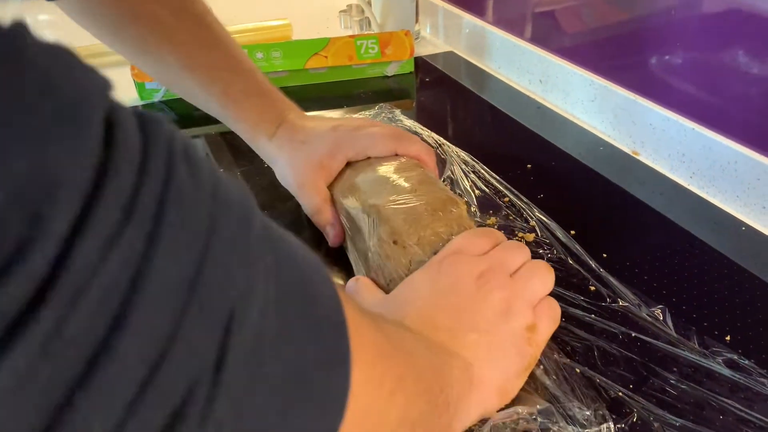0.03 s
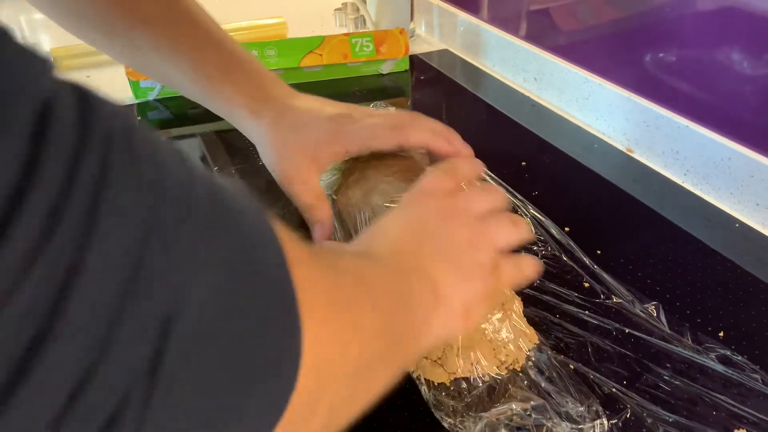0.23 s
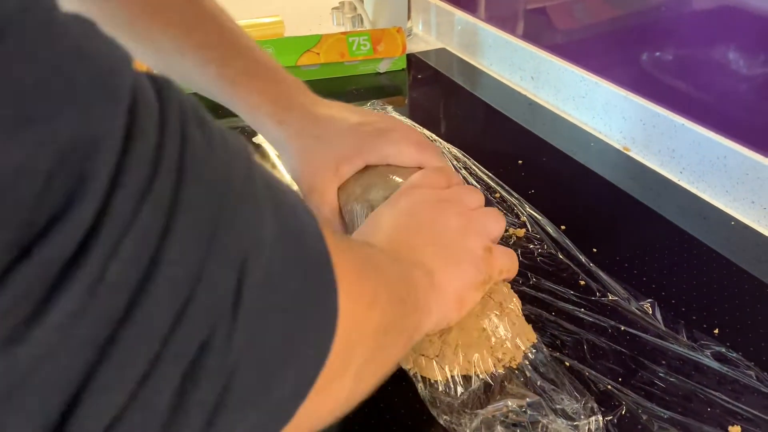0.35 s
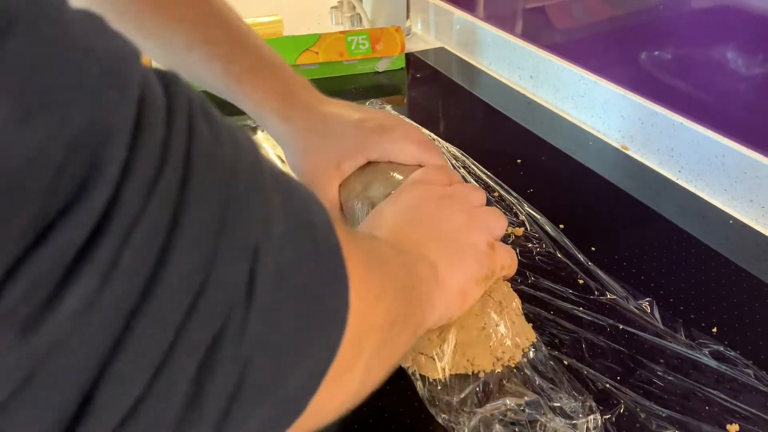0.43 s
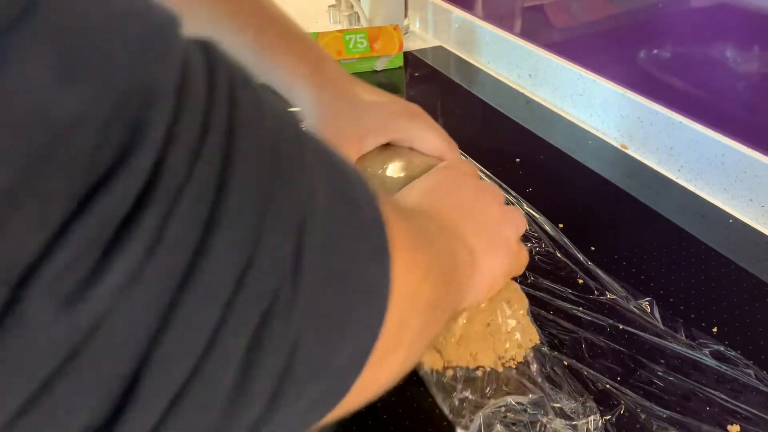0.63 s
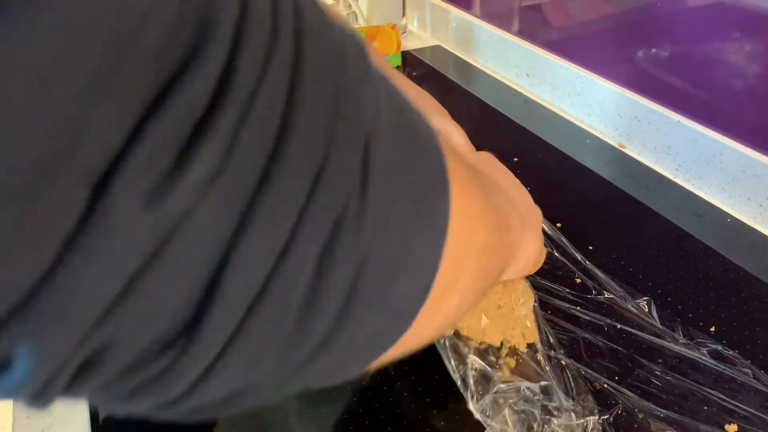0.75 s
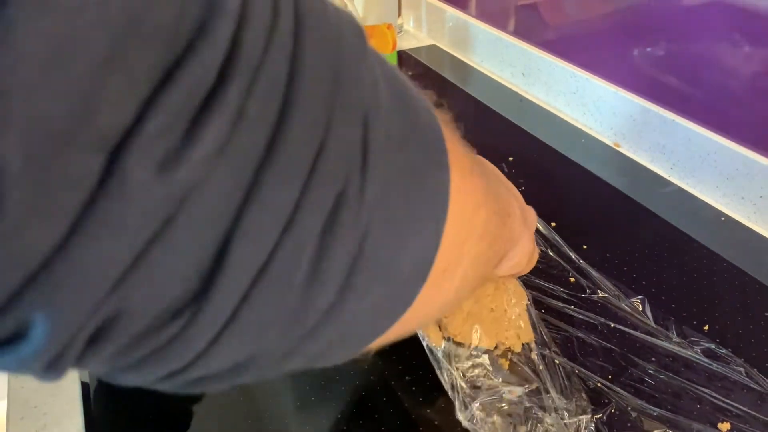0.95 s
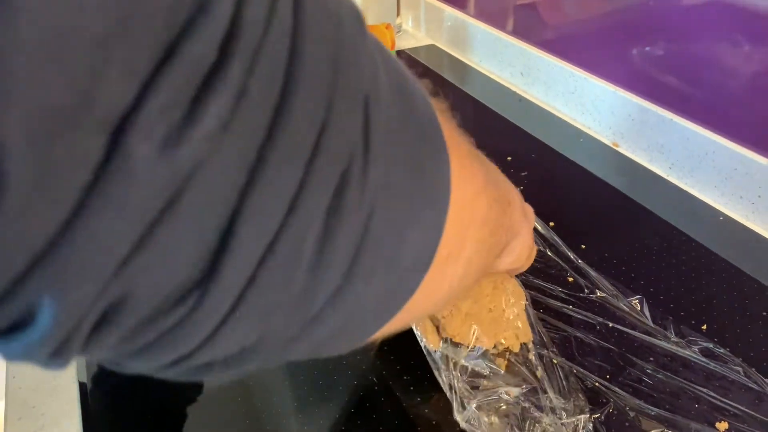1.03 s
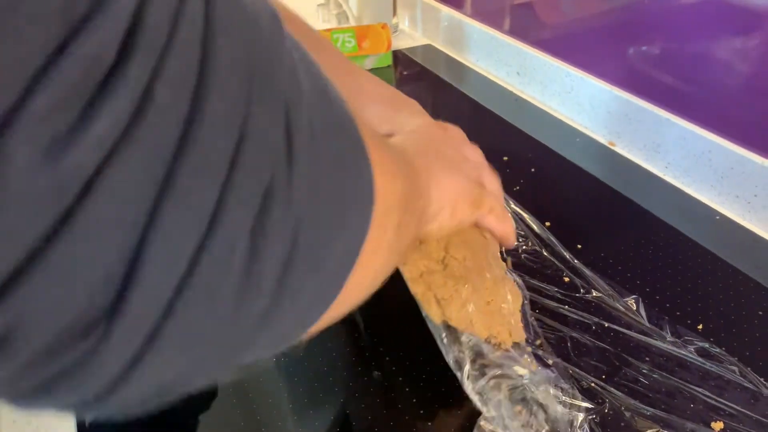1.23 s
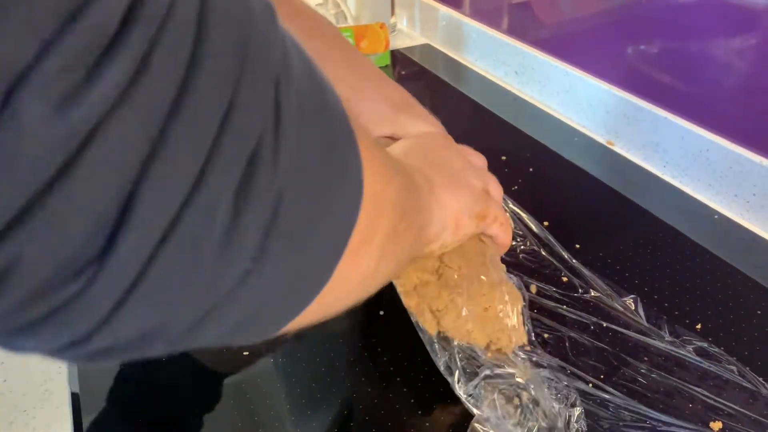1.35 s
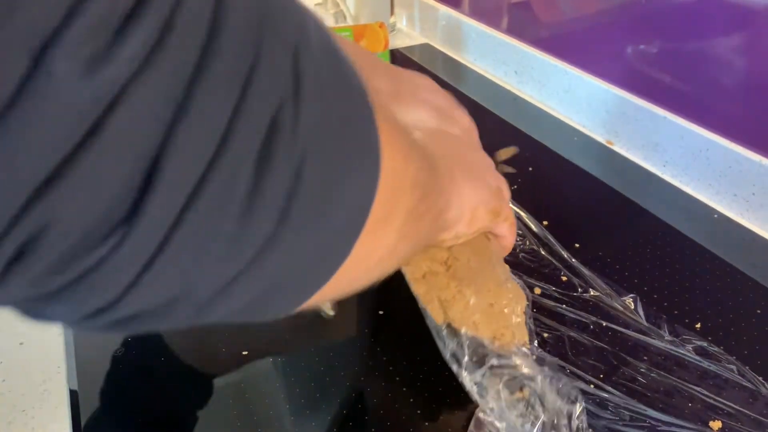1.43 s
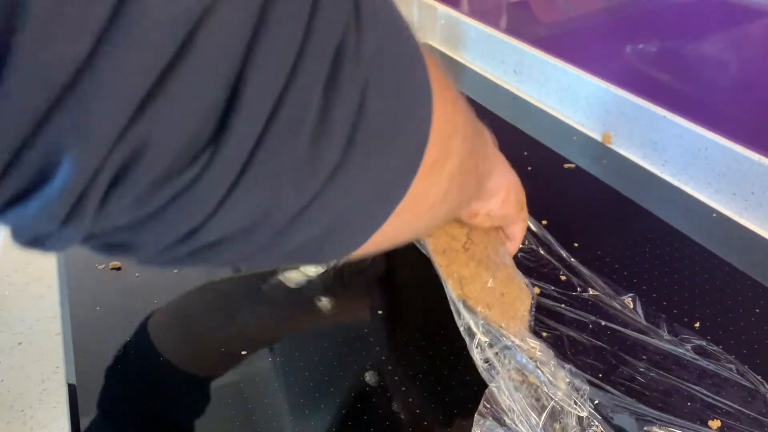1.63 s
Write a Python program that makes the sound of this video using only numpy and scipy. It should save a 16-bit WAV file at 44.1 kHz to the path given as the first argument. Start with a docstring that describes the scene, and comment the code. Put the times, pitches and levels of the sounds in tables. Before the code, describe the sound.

Cling film crackles around dough squeezed by hands on a kitchen worktop, close and in stereo. After a faint rustle, a deep dull thump lands at 0.2 s with a burst of crinkling. Dry crackle, palm rubbing and faint hollow tones continue to 0.75 s, then dip. A knocking thump hits near 0.9 s; from 1.1 s come bright snaps, rustling and softer thumps, strongest near 1.45 s.

```python
"""Hands wrap and squeeze dough in cling film on a kitchen worktop, close to a stereo microphone.
Faint rustle; at 0.2 s a press thumps (swinging sines) and knocks (decaying modes), the film snapping (damped sines).
Crackle (dense grains over noise), palm rub (coarser grains) and hollow tones (resonant noise) follow to 0.75 s.
At 0.88 s a second press knocks and thumps; from 1.1 s come more crackle, snaps and lesser thumps to the end.
The worktop grumbles and creaks (coloured noise) throughout, swelling with the presses."""
import sys
import numpy as np
from scipy import signal
from scipy.fft import rfft, irfft, next_fast_len
from scipy.io import wavfile
from scipy.ndimage import uniform_filter1d, map_coordinates

SR = 44100
rng = np.random.default_rng(int(sys.argv[2]) if len(sys.argv) > 2 else 0)


def output_pcm(signal):
    """Save a mono or channel-first signal as 16-bit PCM at the path in sys.argv[1].

    Samples are clipped to [-1, 1] before scaling.
    """
    pcm = np.clip(np.atleast_2d(signal).T, -1, 1) * 32767
    wavfile.write(sys.argv[1], SR, np.round(pcm).astype(np.int16))


N = 74970  # samples

# film crackle, before lift and flutter: (time [s], level [dB])
FILM_LEVEL = [(0.0, -62.5), (0.036, -50.5), (0.164, -69), (0.174, -66), (0.194, -42.5), (0.208, -51),
              (0.226, -57), (0.306, -59.5), (0.35, -48), (0.382, -54), (0.538, -44), (0.582, -51.5),
              (0.614, -46), (0.644, -49.5), (0.732, -53), (0.752, -48.5), (0.85, -66.5), (0.869, -66),
              (0.875, -47.5), (0.888, -48), (0.936, -57.5), (0.966, -58.5), (1.102, -46), (1.14, -51.5),
              (1.226, -45.5), (1.272, -56), (1.316, -49.5), (1.34, -54), (1.354, -50), (1.396, -50.5),
              (1.472, -55), (1.496, -51.5), (1.538, -56.5), (1.586, -48), (1.7, -49.5)]
# film crackle spectrum: (frequency [Hz], relative level [dB])
FILM_SPECTRUM = [(1760, -19), (3000, -5), (4190, -8.5), (5810, -4.5), (6270, -4.5), (10900, -1.5),
                 (15000, -3.5), (15800, -5.5)]
# loud single film snaps: (time [s], initial amplitude [dB], pitch [Hz])
SNAPS = [(0.193, -39, 13000), (0.2725, -43, 12600), (0.3307, -41, 11400), (0.3513, -32, 13600),
         (0.4703, -43, 8870), (0.6154, -33, 12300), (0.7163, -42, 10200), (0.874, -40, 9000),
         (0.8753, -39, 6400), (1.1575, -40, 7050), (1.188, -42, 7670), (1.2274, -32, 9700),
         (1.3056, -36, 13200), (1.3514, -36, 10400), (1.3555, -29, 13000), (1.3671, -35, 11400),
         (1.3745, -38, 11000), (1.476, -48, 10300), (1.5737, -36, 12000)]
# palms rubbing over film, before lift and flutter: (time [s], level [dB])
PALM_LEVEL = [(0.0, -68), (0.042, -58.5), (0.174, -71.5), (0.194, -46.5), (0.212, -57.5), (0.268, -65),
              (0.416, -60), (0.43, -50.5), (0.482, -55.5), (0.51, -47), (0.59, -53.5), (0.606, -49.5),
              (0.724, -59.5), (0.738, -55), (0.87, -67.5), (0.877, -51), (0.95, -63), (1.234, -55.5),
              (1.258, -60), (1.43, -55), (1.462, -57.5), (1.604, -59), (1.7, -63)]
# palm rub spectrum: (frequency [Hz], relative level [dB])
PALM_SPECTRUM = [(260, -15.5), (450, -8.5), (627, -6.5), (783, -2), (930, -0.5), (1140, -2), (2120, -8.5),
                 (5000, -11), (6500, -24.5), (11000, -120)]
# air pockets under cupped hands: (mid time [s], swell sigma [s], pitch [Hz], level [dB])
HOLLOWS = [(0.441, 0.028, 1130, -55.5), (0.446, 0.032, 2100, -56), (0.512, 0.013, 2083, -52),
           (0.517, 0.034, 1485, -53), (.56, 0.021, 2850, -57), (0.632, 0.025, 773, -54.5),
           (0.741, 0.0034, 354, -45), (1.088, 0.04, 875, -63.5), (1.198, 0.038, 820, -56),
           (1.202, 0.013, 333, -53.5), (1.421, 0.023, 895, -54)]
# presses thumping the worktop: (time of deepest swing [s], peak [dB], pitch [Hz], rise sigma [s])
THUMPS = [(0.221, -23.5, 64, 0.0074), (0.264, -34, 72, 0.0055), (0.321, -47.5, 66, 0.0075),
          (0.376, -51.5, 66, 0.015), (0.534, -49, 74, 0.017), (0.756, -45.5, 76.5, 0.015),
          (.907, -29, 63, 0.0071), (0.963, -45, 62, 0.007), (1, -46.5, 62, 0.012), (1.06, -46, 66, 0.0073),
          (1.19, -33, 65.4, 0.0093), (1.315, -42.5, 74, 0.011), (1.432, -39.5, 95, 0.0043),
          (1.456, -29.5, 67.3, 0.012), (1.503, -41, 68, 0.027), (1.624, -44, 63.6, 0.0084)]
# knuckle and fingertip knocks: (time [s], level at 270 Hz [dB], tilt [dB/octave])
KNOCKS = [(0.615, -42.5, 14.5), (.734, -49, 3.5), (.875, -33.5, 3), (.882, -37, -3.5), (0.891, -35.5, -1),
          (.919, -48.5, -14), (0.206, -43.5, -15.5)]
# worktop modes struck by knocks: (frequency [Hz], relative level [dB], t60 [s])
WORKTOP_MODES = [(186.3, -2.5, 0.075), (349, -5, 0.047), (435, -12, 0.016), (840, -28, 0.073)]
# low grumble under the kneading, before lift and flutter: (time [s], level [dB])
GRUMBLE_LEVEL = [(0.0, -75), (0.07, -59), (0.13, -77), (0.18, -68), (0.21, -37), (0.278, -51),
                 (0.382, -58.5), (0.506, -67.5), (0.65, -69), (0.75, -65), (0.86, -73), (0.9, -53),
                 (0.97, -48), (1.098, -60.5), (1.234, -56.5), (1.396, -59), (1.614, -58), (1.7, -65.5)]
# grumble spectrum: (frequency [Hz], relative level [dB])
GRUMBLE_SPECTRUM = [(12, -36), (20, -2.5), (41, -4.5), (62, 0.5), (126, -11), (150, -32.5), (200, -38),
                    (330, -120)]
# upper worktop resonances under the kneading, before flutter: (time [s], level [dB])
CREAK_LEVEL = [(0.0, -68.5), (0.08, -59), (0.156, -73), (0.202, -53.5), (0.268, -53.5), (0.306, -64),
               (0.634, -57), (0.704, -66), (0.738, -55), (0.868, -67), (0.884, -48.5), (0.994, -66),
               (1.24, -54), (1.264, -61.5), (1.414, -60.5), (1.448, -51), (1.548, -66), (1.7, -67)]
# creak spectrum: (frequency [Hz], relative level [dB])
CREAK_SPECTRUM = [(82, -24.5), (140, -1), (151, -14), (189, -1.5), (231, -10.5), (269, -7.5), (355, -4.5),
                  (470, -13), (600, -13.5), (780, -24), (1320, -120)]
# power that arrives straight: (frequency [Hz], share [0-1])
DIRECT_SHARE = [(60, .98), (300, .93), (600, .75), (1000, .65), (2800, .45), (5600, .5), (9000, .35)]
# stereo side gain: (frequency [Hz], gain [dB])
SIDE_GAIN = [(300, -2), (850, -7), (1200, 0), (7000, 0), (9500, -2), (11000, -17), (12500, -32)]
# channel balance: (frequency [Hz], left minus right [dB])
BALANCE = [(60, -1), (180, 3), (550, -1.5), (1650, -0.5), (4970, 3), (15000, -1)]

GRAINS_PER_S, GRAIN_SPREAD_LOG, GRAIN_DECAY_CYCLES = 5000, 0.47, 1.13
FILM_GRAIN_HZ, FILM_SIZE_DB, FILM_NOISE_SHARE = 8870, 2.5, 0.3
PALM_GRAIN_HZ, PALM_SIZE_DB, PALM_NOISE_SHARE = 2370, 2.42, 0.55
SNAP_DECAY_CYCLES, FIZZ_DB, FIZZ_T60_S = 2.14, -9.5, 0.023
PATCH_RMS_DB, HOLLOW_Q = 2.5, 9.7
THUMP_TAIL_STRETCH = 0.79  # fall sigma / rise sigma
KNOCK_RISE_S = 0.0015
LEFT_LAG_S, TOP_HZ = 20 / 44100, 15830


def amp(db):
    """Amplitude from dB."""
    return 10 ** (np.asarray(db) / 20)


def unit(x):
    """x at rms 1."""
    return x / np.sqrt(np.mean(x ** 2) + 1e-20)


def along(points, hz):
    """Interpolate (frequency, value) rows on a log axis."""
    f, v = np.transpose(points)
    return np.interp(np.log(hz + 1), np.log(f + 1), v)


def level(rows):
    """Gain per sample from (time, dB) rows."""
    s, db = np.transpose(rows)
    return amp(np.interp(np.arange(N) / SR, s, db))


def wobble(knots_per_s):
    """Smooth random curve through Gaussian knots."""
    knots = rng.standard_normal(int(N * knots_per_s / SR) + 4)
    return map_coordinates(knots, [np.arange(N) * knots_per_s / SR])


def filtered(x, response):
    """x times a response of frequency."""
    m = next_fast_len(N + SR // 2)
    return irfft(rfft(x, m) * response(np.fft.rfftfreq(m, 1 / SR)), m)[..., :N]


def coloured(x, spectrum):
    """x shaped by a spectrum, at rms 1."""
    return unit(filtered(x, lambda hz: amp(along(spectrum, hz))))


def grains(s, size, hz, decay_cycles, length=64):
    """Sum of short damped sines, length in samples."""
    t = np.arange(length) / SR
    decay = np.exp(-t * hz[:, None] / decay_cycles)
    wave = size[:, None] * np.sin(2 * np.pi * hz[:, None] * t) * decay
    at = (s * SR).astype(int)[:, None] + np.arange(length)
    return np.bincount(at.ravel(), wave.ravel(), N + SR)[:N]


def whitened(x):
    """x with its average spectrum flattened, at rms 1."""
    hz, power = signal.welch(x, SR, nperseg=128)
    floor = 0.00087 * power.max()
    return unit(filtered(x, lambda f: np.interp(f, hz, power + floor) ** -.5))


def placed(straight, scattered):
    """Straight sound reaches the right channel first; scattered sound differs between channels."""
    def share(hz):
        return np.clip(along(DIRECT_SHARE, hz), 0, 1)

    def lag(hz):
        return np.exp(-1j * np.pi * hz * LEFT_LAG_S * np.array([[1], [-1]]))

    direct = filtered(straight, lambda hz: np.sqrt(share(hz)) * lag(hz))
    return direct + filtered(scattered, lambda hz: np.sqrt(1 - share(hz)))


def patchy(x):
    """Random gain patches in time and frequency, alike in both channels."""
    z = signal.stft(x, nperseg=512)[2]
    field = uniform_filter1d(rng.standard_normal(z.shape[1:]), size=4, axis=0)
    field = uniform_filter1d(field, size=6, axis=1)
    return signal.istft(z * amp(PATCH_RMS_DB * unit(field)), nperseg=512)[1][:, :N]


def crackle(per_s, hz, size_db, noise_share, spectrum):
    """Random grains of uneven size over noise, in three strands: straight, left, right."""
    count = int(per_s * N / SR)
    strands = []
    for _ in range(3):
        u, g = rng.random((count, 2)), rng.standard_normal(count)
        size = amp(-size_db * np.log(1 - u[:, 1])) * np.sign(g)  # exponential in dB, either sign
        pitch = np.clip(hz * np.exp(GRAIN_SPREAD_LOG * rng.permutation(g)), 300, SR / 2.5)
        snaps = whitened(grains(u[:, 0] * N / SR, size, pitch, GRAIN_DECAY_CYCLES))
        mix = np.sqrt(1 - noise_share) * snaps + np.sqrt(noise_share) * rng.standard_normal(N)
        strands.append(coloured(mix, spectrum))
    return unit(patchy(placed(strands[0], np.array(strands[1:]))))


def film_crackle():
    """Dense tiny film snaps over a rustle, fluttering in level."""
    flutter_db = 2.5 + 0.42 * wobble(60.14) + 0.87 * wobble(150.5)
    bed = crackle(GRAINS_PER_S, FILM_GRAIN_HZ, FILM_SIZE_DB, FILM_NOISE_SHARE, FILM_SPECTRUM)
    return bed * level(FILM_LEVEL) * amp(flutter_db)


def film_snaps():
    """Loud single snaps as damped sines, each with a short decaying fizz."""
    s, db, hz = np.transpose(SNAPS)
    snaps = grains(s, amp(db), hz, SNAP_DECAY_CYCLES)
    fizz = rng.standard_normal((2, 400)) * amp(-60 * np.arange(400) / SR / FIZZ_T60_S)
    return snaps + amp(FIZZ_DB) * signal.fftconvolve(snaps[None], fizz, axes=1)[:, :N]


def palms():
    """Duller, coarser grains as skin drags over the film."""
    rub = crackle(GRAINS_PER_S / 2, PALM_GRAIN_HZ, PALM_SIZE_DB, PALM_NOISE_SHARE, PALM_SPECTRUM)
    return rub * level(PALM_LEVEL) * amp(2.0 + 1.36 * wobble(70.0))


def hollows():
    """Air pockets as narrow resonances, each stirred by a short swell of noise."""
    t = np.arange(N) / SR
    out = np.zeros((3, N))
    for s, sigma_s, hz, db in HOLLOWS:
        def resonance(f):
            damping = (f * hz / HOLLOW_Q) ** 2
            return damping / ((hz * hz - f * f) ** 2 + damping)

        ring = filtered(rng.standard_normal((3, N)), resonance)
        swell = np.exp(-((t - s) / sigma_s) ** 2 / 2)
        rms = np.sqrt(np.sum(swell * ring ** 2, axis=1, keepdims=True) / swell.sum())
        out += amp(db) * swell * ring / rms
    return placed(out[0], out[1:])


def thumps():
    """Presses swing the worktop: cosines under lopsided Gaussian envelopes, downward at the peak."""
    t = np.arange(N) / SR
    out = np.zeros(N)
    for s, db, hz, rise_s in THUMPS:
        u = (t - s) / np.where(t < s, rise_s, rise_s * THUMP_TAIL_STRETCH)
        out -= amp(db) * np.exp(-u ** 2 / 2) * np.cos(2 * np.pi * hz * (t - s))
    return out


def knocks():
    """Each knock excites the worktop's modes, tilted by its brightness."""
    t = np.arange(N) / SR
    out = np.zeros(N)
    for s, db, tilt_db in KNOCKS:
        age = np.clip(t - s, 0, None)
        rise = 1 - np.exp(-age / KNOCK_RISE_S)
        for hz, mode_db, t60_s in WORKTOP_MODES:
            decay_db = db + mode_db + tilt_db * np.log2(hz / 270) - 60 * age / t60_s
            out += amp(decay_db) * np.sin(2 * np.pi * hz * age) * rise
    return out


def worktop_grumble():
    """Low grumble and upper creak of the pressed slab, as coloured noise."""
    noise = rng.standard_normal((2, 3, N))
    grumble = coloured(noise[0], GRUMBLE_SPECTRUM) * level(GRUMBLE_LEVEL) * amp(4 + 2.5 * wobble(25))
    creak = coloured(noise[1], CREAK_SPECTRUM) * level(CREAK_LEVEL) * amp(1.24 * wobble(40.03))
    both = grumble + creak
    return placed(both[0], both[1:])


def scene():
    """Sum of all sources, in stereo."""
    hands = film_crackle() + film_snaps() + palms() + hollows()
    return hands + thumps() + knocks() + worktop_grumble()


def record(dry):
    """Channel balance, a stereo width that closes in the top treble, and the band limit."""
    x = filtered(dry, lambda hz: amp(along(BALANCE, hz) / 2 * np.array([[1], [-1]])))
    mid = (x[0] + x[1]) / 2
    side = filtered((x[0] - x[1]) / 2, lambda hz: amp(along(SIDE_GAIN, hz)))
    return filtered(np.array([mid + side, mid - side]), lambda hz: hz < TOP_HZ)


dry = scene()
out = record(dry)
output_pcm(out)
```